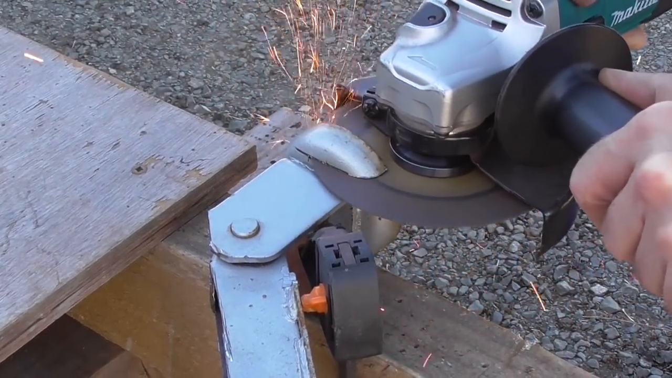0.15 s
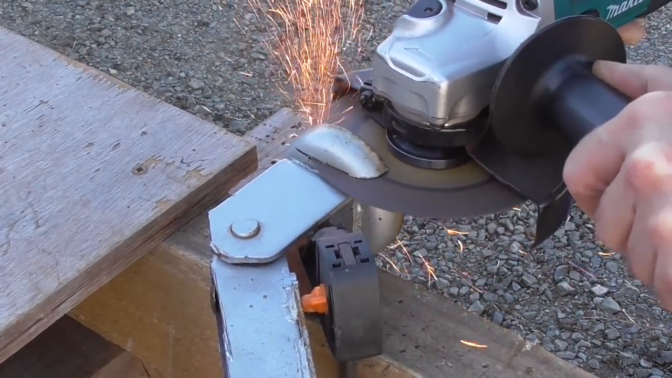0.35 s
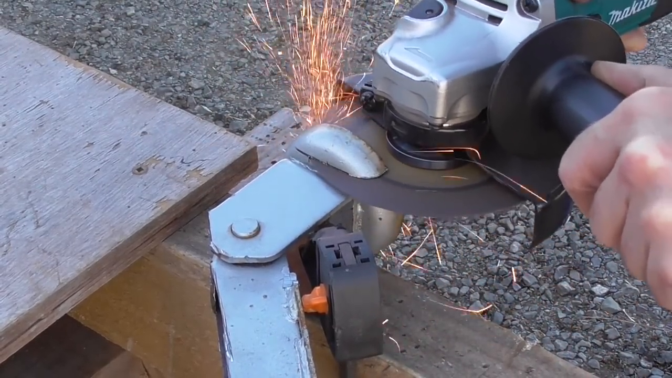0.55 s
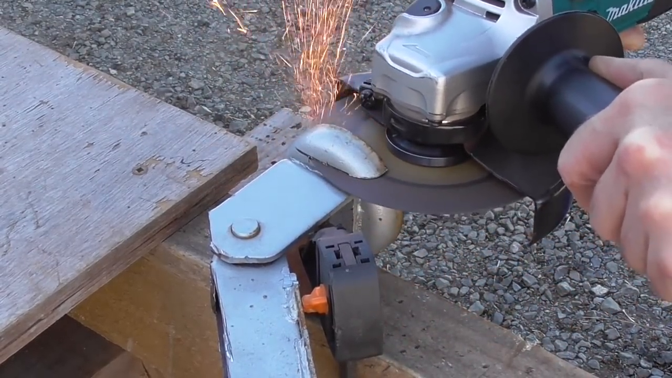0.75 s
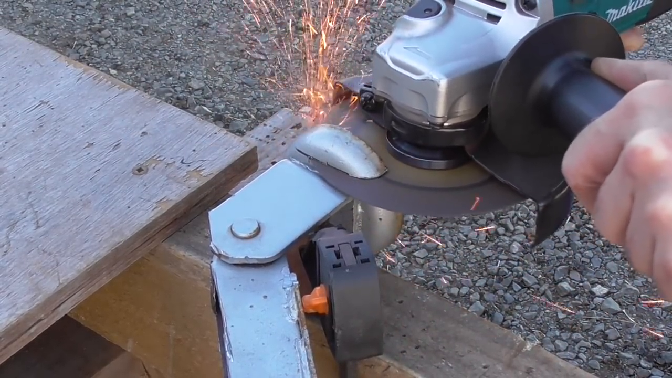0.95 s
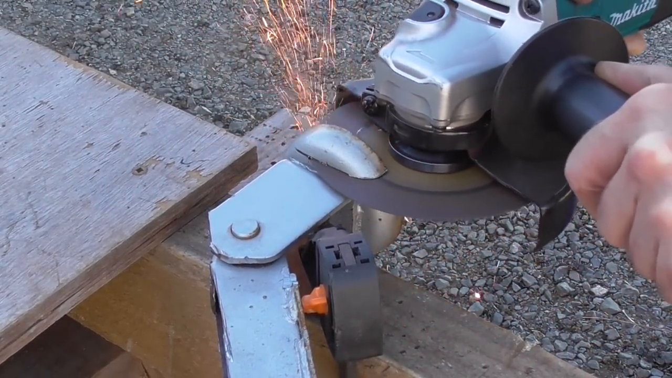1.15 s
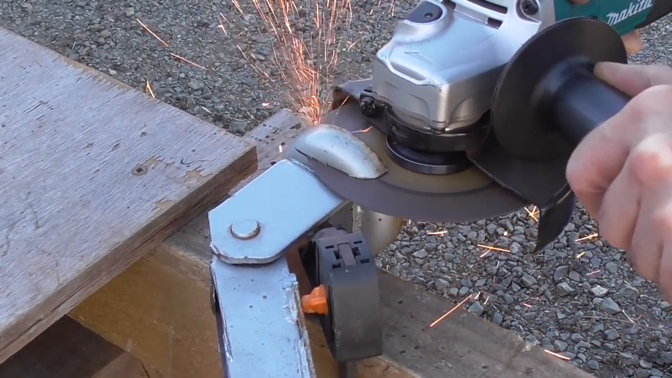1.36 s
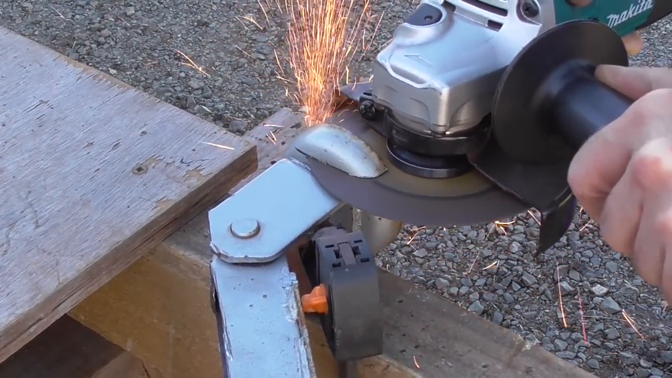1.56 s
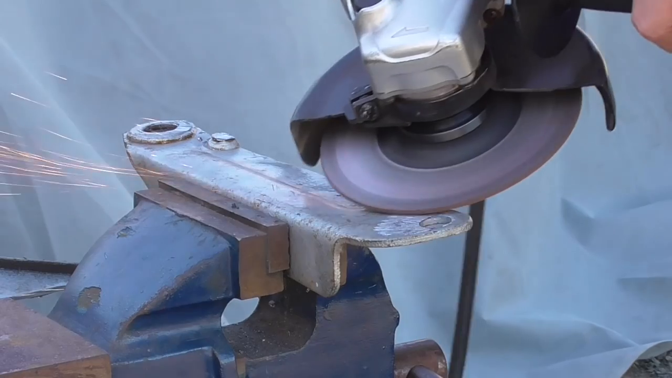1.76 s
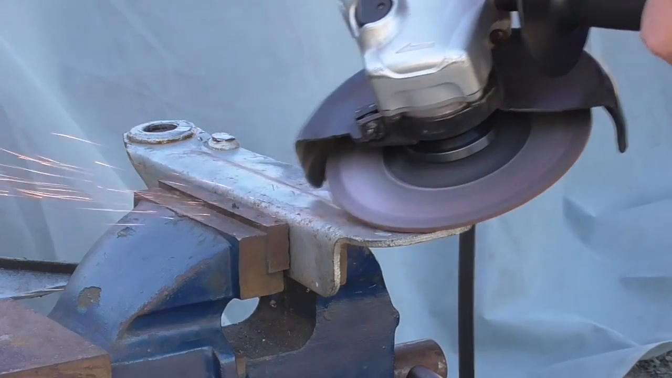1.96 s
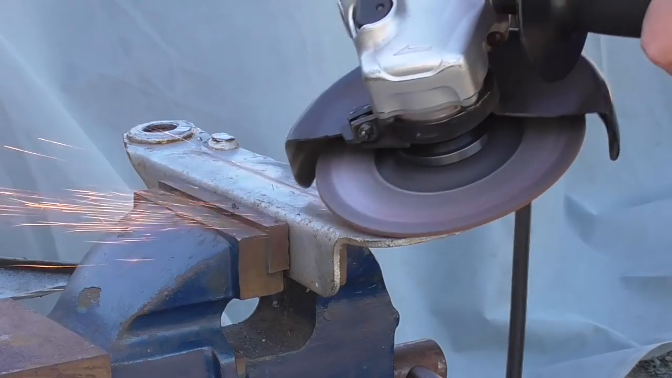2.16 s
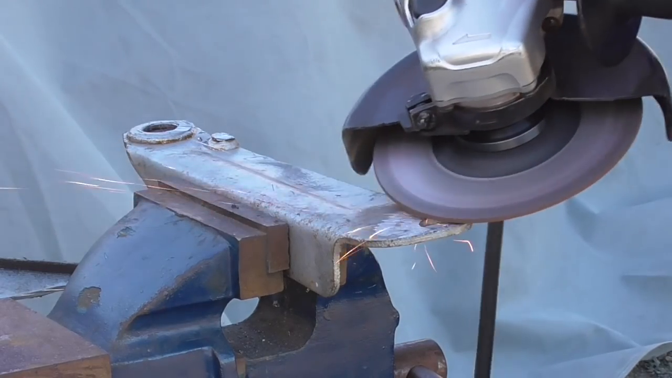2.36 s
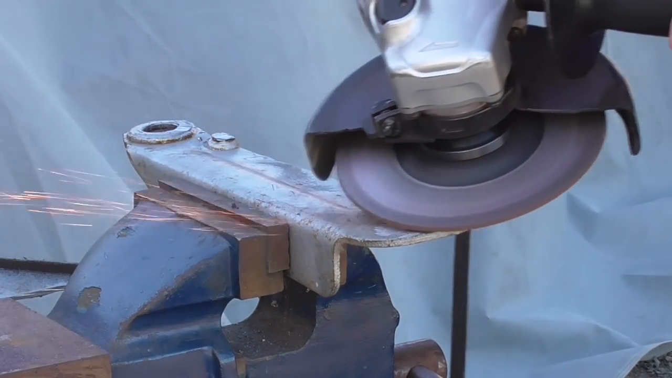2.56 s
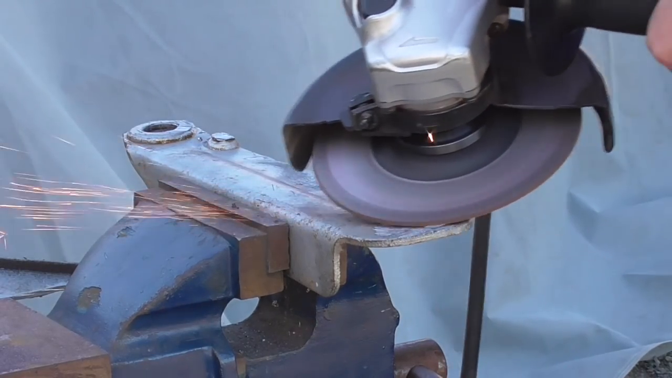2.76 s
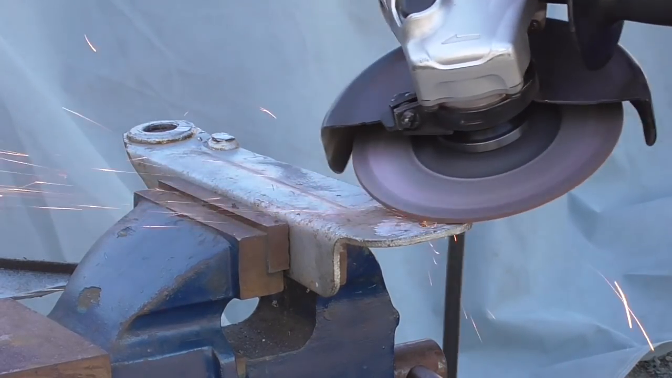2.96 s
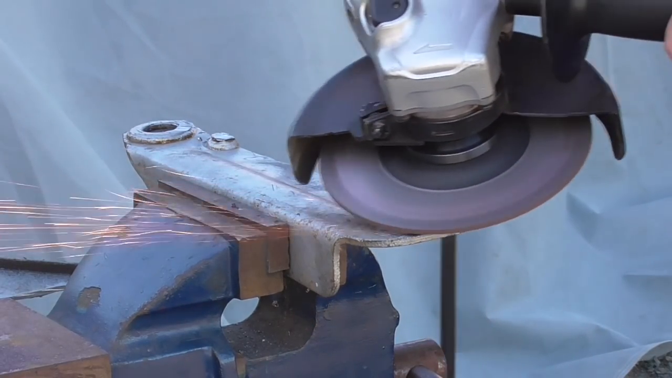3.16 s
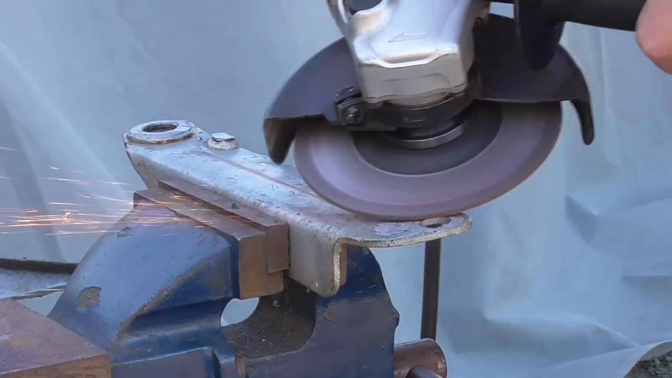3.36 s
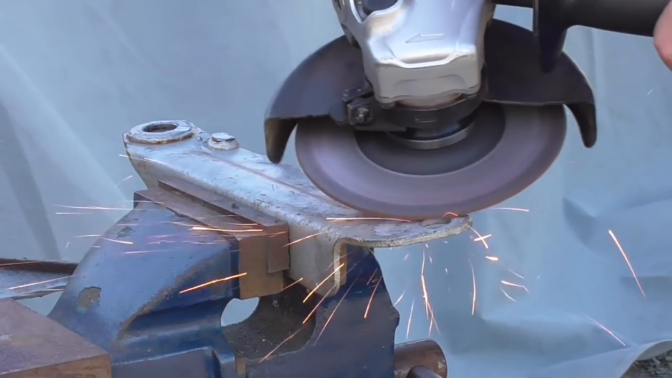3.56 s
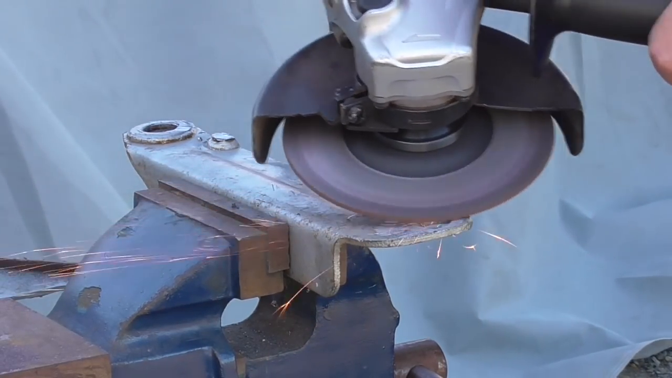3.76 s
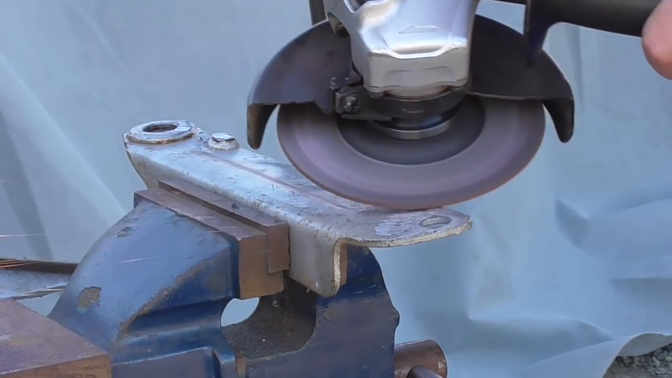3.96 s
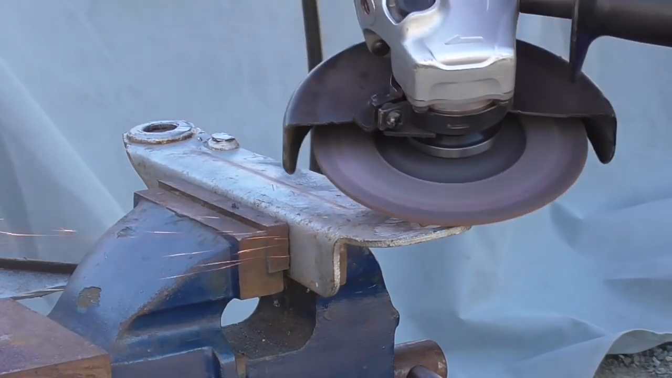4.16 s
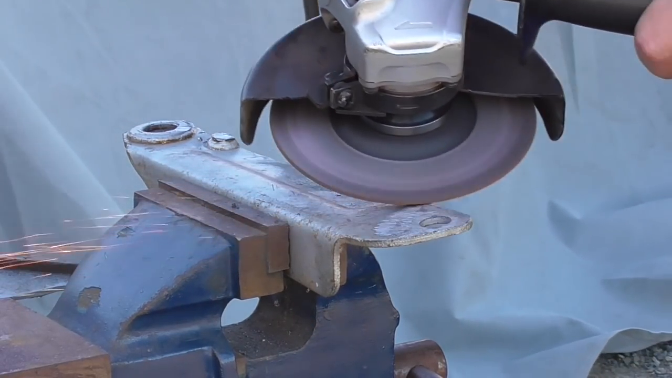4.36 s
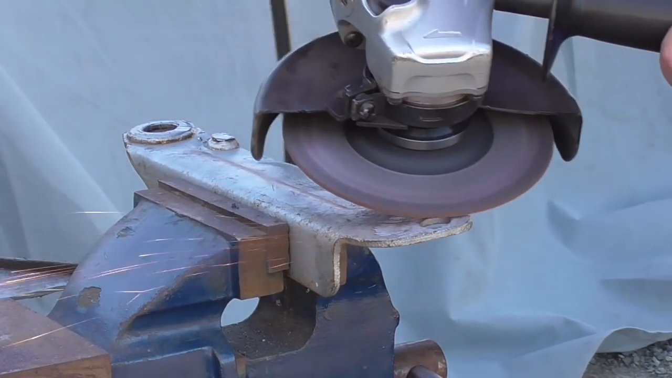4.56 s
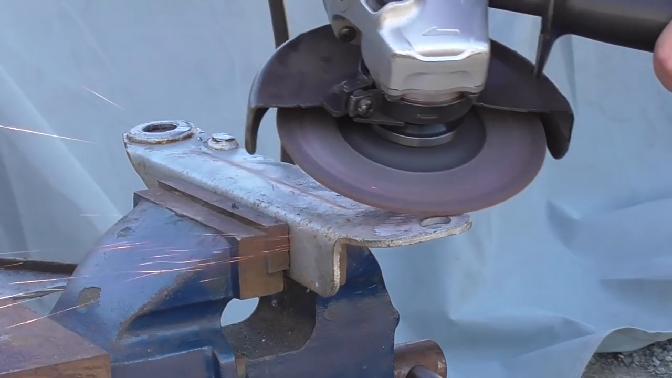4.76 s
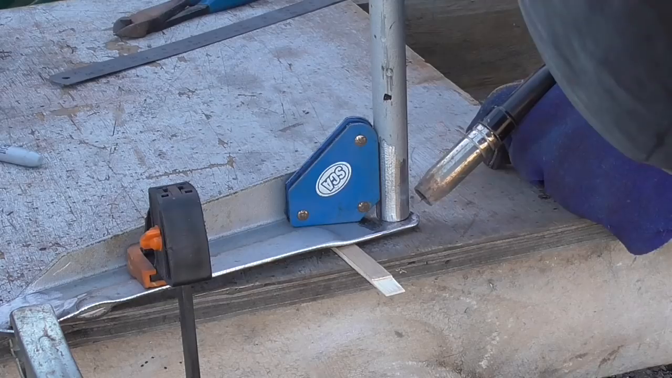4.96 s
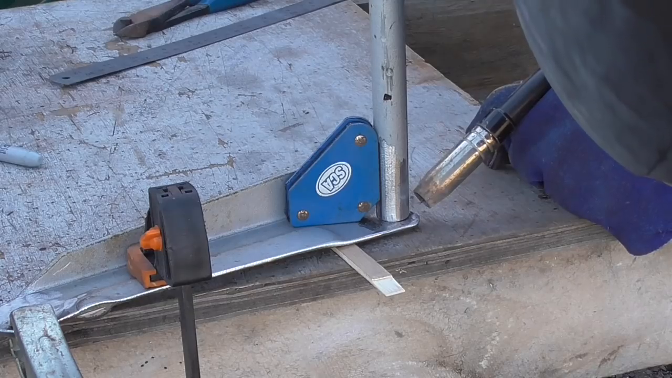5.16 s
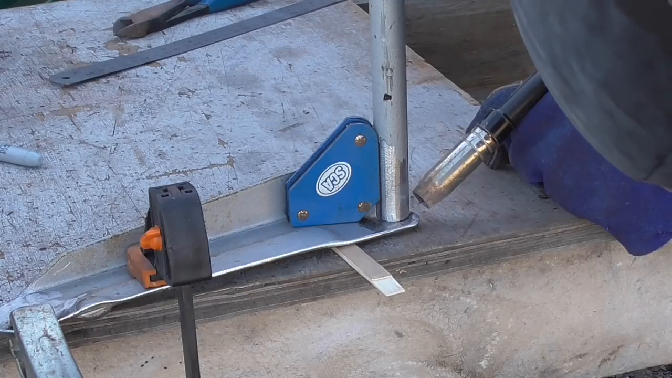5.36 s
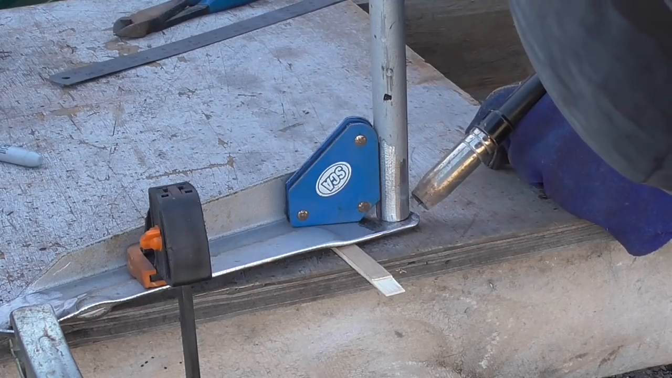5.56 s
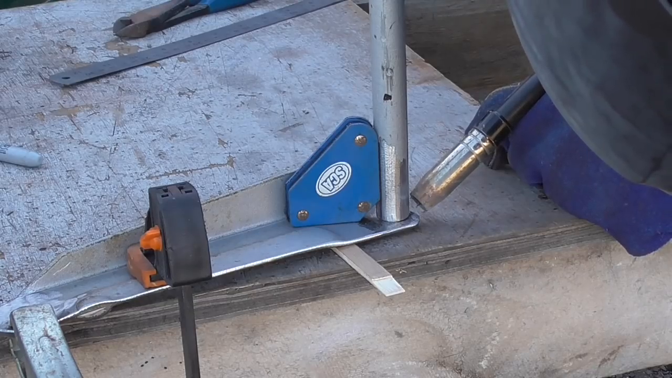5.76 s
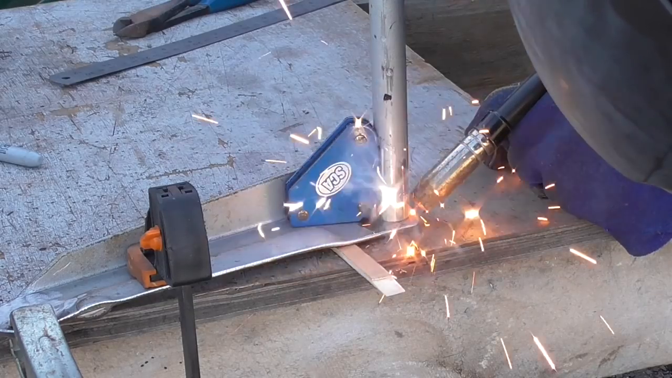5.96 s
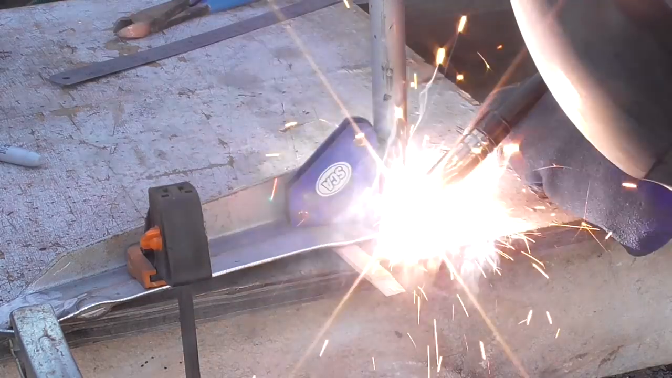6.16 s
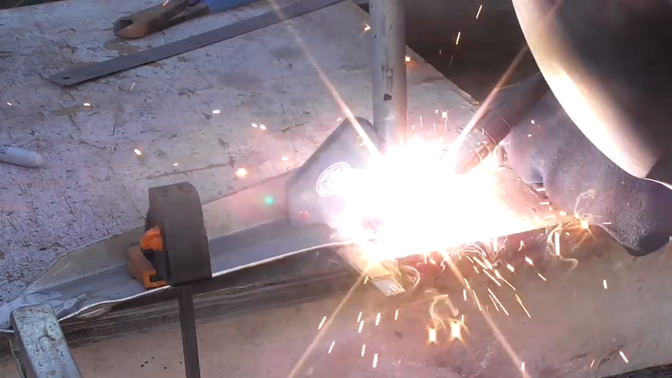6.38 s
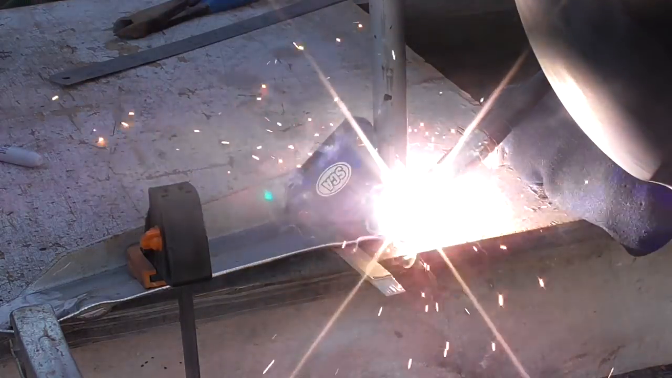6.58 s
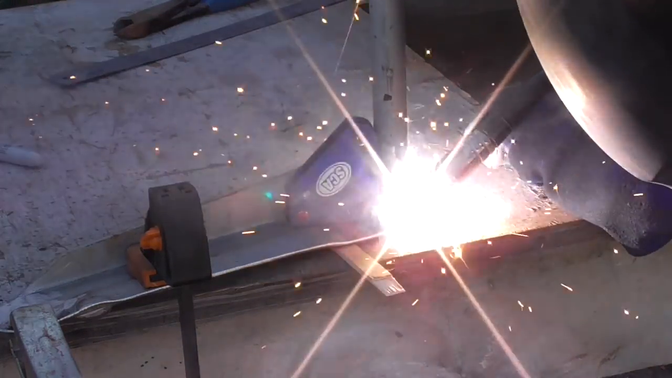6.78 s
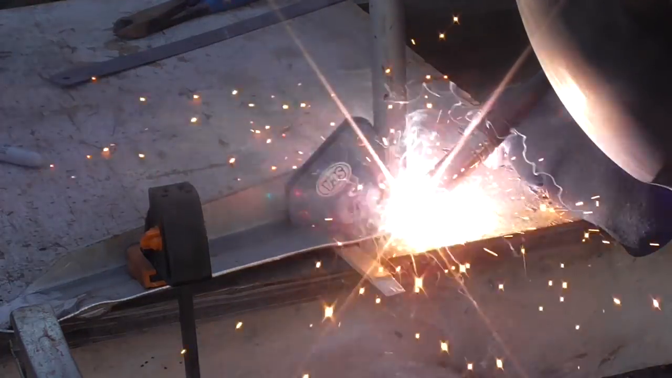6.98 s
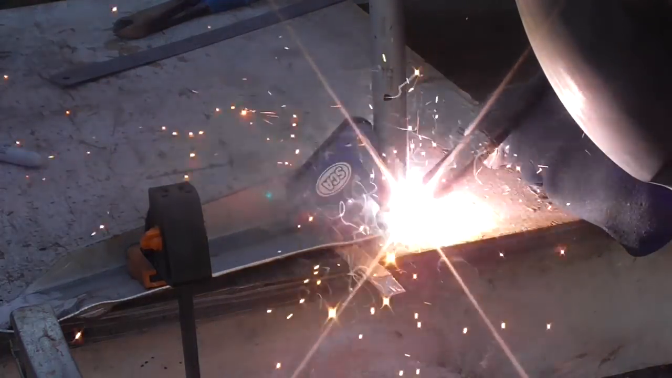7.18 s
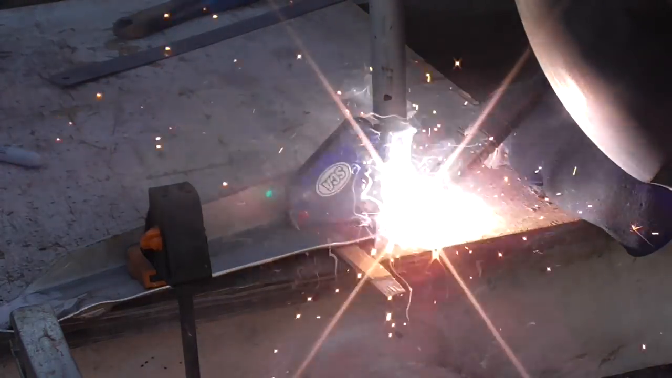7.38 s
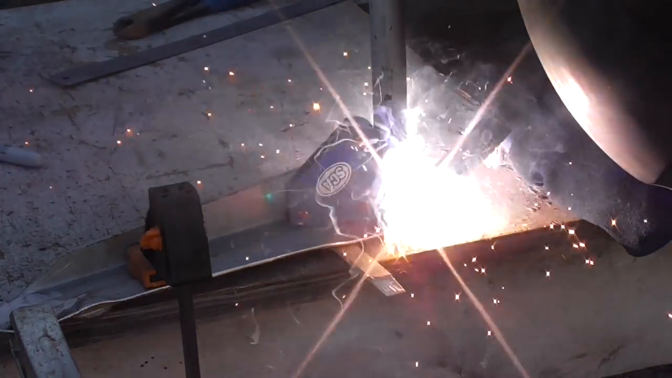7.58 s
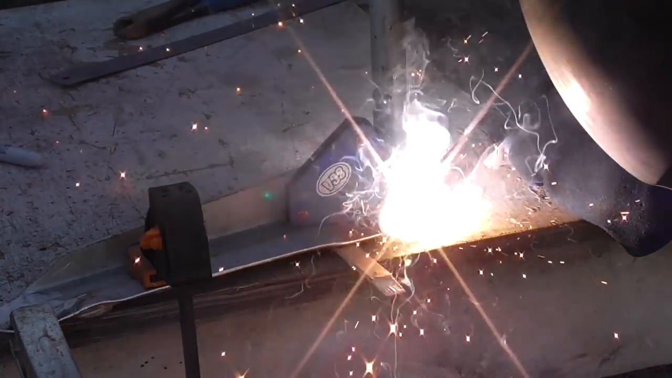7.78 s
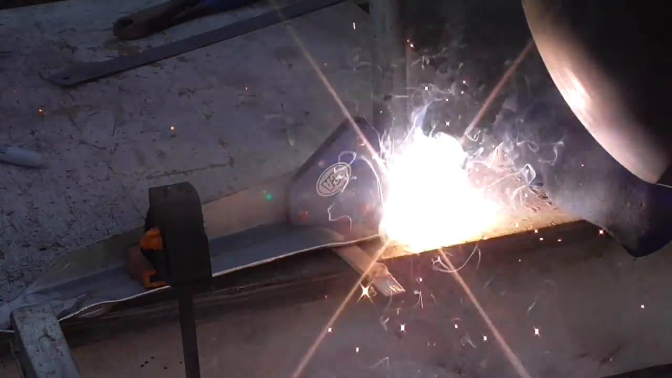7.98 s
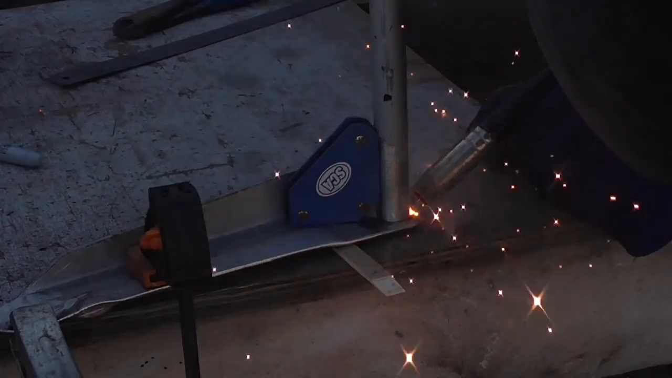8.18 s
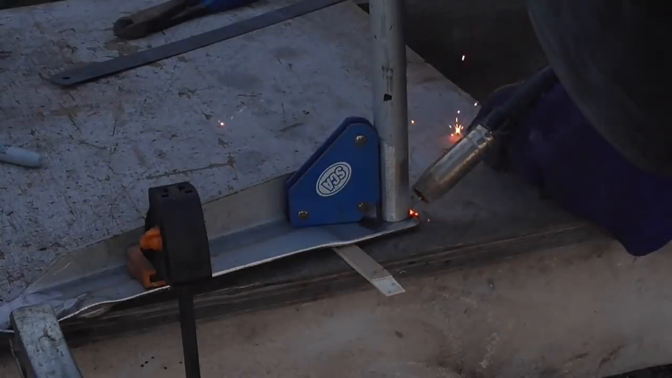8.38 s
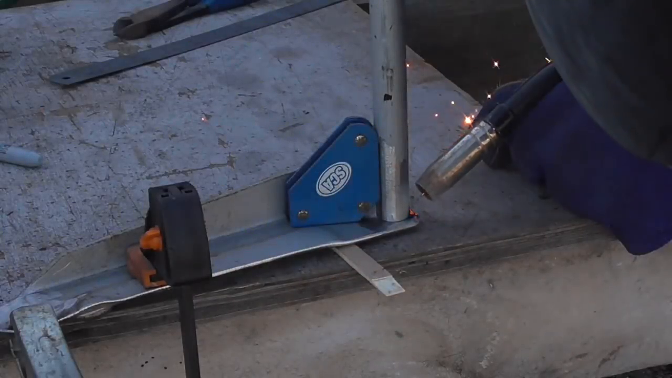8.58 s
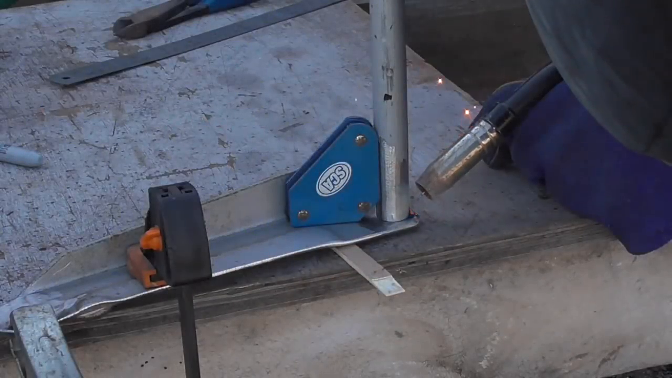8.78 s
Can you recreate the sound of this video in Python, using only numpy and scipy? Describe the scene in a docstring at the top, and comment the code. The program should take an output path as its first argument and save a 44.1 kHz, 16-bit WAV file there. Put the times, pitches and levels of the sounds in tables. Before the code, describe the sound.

Close up outdoors, a cutting disc tears through steel with a bright, steady rasp and whine. It abruptly becomes a grinding disc stroking a clamped bracket, chattering at first, then smoother, with brief squeals. Another sudden jump leaves a humming fan, shrill insects, a faint bird chirp and buffeting wind. A scuff and one sputter precede a loud buzzing, crackling weld, which stops sharply, leaving the fan.

```python
"""An angle grinder cuts a steel bar, then dresses a bracket, then a wire welder runs a bead: three outdoor jobs,
switching abruptly. The discs are noise repeating each turn, shaped by steel resonances, under a whine of sines.
The bracket scrapes once a turn, chatters, rings and squeals. The arc is noise pulsed by a 100 Hz supply ripple,
with impulses for shorting wire and bursting droplets. Wind of filtered noise runs throughout, with gusts during
the cutting and the welding; the weld also has a fan, insects of resonant noise and a bird of gliding sines."""
import sys
import numpy as np
from scipy import signal
from scipy.fft import rfft, irfft
from scipy.io import wavfile
from scipy.ndimage import uniform_filter1d, map_coordinates

SR = 44100
rng = np.random.default_rng(int(sys.argv[2]) if len(sys.argv) > 2 else 0)


def master(y):
    """Save y as 16-bit WAV."""
    cut = np.clip(np.atleast_2d(y).T, -1, 1)
    pcm = np.round(cut * 32767)  # scale
    wavfile.write(sys.argv[1], SR, pcm.astype(np.int16))


N = 389403
TIME = np.arange(N) / SR
CUT_END_S, GRIND_END_S = 1.655, 4.951

# Cutting disc speed: (time [s], speed [turns/s])
CUT_SPEED = [(0, 127.6), (.2, 123.5), (.35, 132.4), (.42, 128.6), (.52, 126.3), (.63, 131.9), (.69, 130.1),
             (.76, 132.4), (.85, 131.8), (.95, 134.1), (1.08, 130.5), (1.16, 126.2), (1.31, 131),
             (1.44, 126.3), (1.65, 123.1)]
# Tone of the cutting rasp: (frequency [Hz], level [dB per Hz])
CUT_COLOUR = [(60, -37), (250, -17), (550, -11.5), (850, -10.5), (1400, -5.5), (1800, -12.5), (2700, -12),
              (3400, -4), (4300, 2), (5400, -4.5), (7500, -2.5), (9300, 1.5), (12000, -6), (15500, -13.5)]
# Resonances of bar and guard: (frequency [Hz], width [Hz], lift [dB])
CUT_MODES = [(1525, 170, 5.5), (4570, 200, 4), (11010, 100, 11.5)]
# Pushes of the hand into the slot: (middle [s], rise [dB])
PUSHES = [(.16, 2), (.39, 2), (.66, 2.5), (.97, 2), (1.35, 1.5), (1.58, 2)]
# The bar sings as the disc binds: (middle [s], length [s], multiple of disc speed [1], level [dB])
CUT_SWELLS = [(.33, .18, 12, -51), (.41, .12, 11, -50), (.86, 0.41, 11, -51), (1.103, .13, 36, -41),
              (1.197, .16, 18, -56), (1.303, 0.11, 12, -48), (1.48, 0.11, 18, -54), (1.56, .2, 12, -53)]
CUT_DB, PUSH_S = -35.5, 0.15  # steady feed before the pushes; length of one push

# Light air round the grinder: (time [s], level [dB])
LIGHT_AIR = [(0, -68), (2.4, -66.5), (3.5, -78), (4.95, -80)]
# Gusts during cutting and welding: (middle [s], length [s], level [dB])
GUSTS = [(.56, 0.56, -58.5), (1.386, 0.29, -56), (5.0, 0.17, -42), (5.236, 0.17, -43), (5.45, 1.54, -52),
         (5.66, 0.36, -46), (5.898, 0.27, -40.5), (6.38, 0.24, -49), (6.813, 0.55, -49.5)]
# Tone of the wind: (frequency [Hz], level [dB per Hz])
WIND_COLOUR = [(20, -14), (40, -12), (70, 1.5), (120, 4.5), (185, 5.5), (280, -6.5), (500, -17.5),
               (1200, -26), (4000, -54)]
WELD_AIR_DB, GUST_SHAPE = -63, 1.3  # light air of the weld before YARD_LEVEL; gust sharpness

# Grinding disc speed: (time [s], speed [turns/s])
GRIND_SPEED = [(1.7, 155), (2.32, 152.8), (2.5, 154.8), (2.92, 154.5), (3.22, 154), (4.12, 154.7),
               (4.27, 154.7), (4.57, 156.1), (4.95, 155.6)]
# Tone of the scrape: (frequency [Hz], level [dB per Hz])
GRIND_COLOUR = [(300, -27.5), (1200, -20), (2800, -10.5), (4000, -3), (4800, -2.5), (6000, 1), (8300, 3),
                (10500, 1), (12500, -7.5), (15500, -16.5)]
# Resonances of the bracket: (frequency [Hz], width [Hz], level before pressure [dB])
BRACKET_MODES = [(4246, 120, -15.5), (6486, 270, -6), (7000, 640, -14.5), (7490, 260, -16.5),
                 (8930, 290, -16.5), (9900, 300, -21), (11270, 230, -26), (12970, 220, -21.5)]
# Strokes over the bracket: (middle [s], length [s], level [dB], chatter [0-1], treble change [dB])
STROKES = [(1.87, 0.33, -31, 1, -9), (2.114, 0.24, -31.5, 1, 2.5), (2.329, 0.29, -30.3, 0.85, -2.5),
           (2.543, 0.18, -31.5, 0.3, 1.5), (2.726, 0.2, -30.5, 0.4, 0), (3.005, 0.34, -30, 0.6, -2),
           (3.288, 0.28, -29.5, 0.52, -0.5), (3.605, 0.52, -31.5, 0.5, -1), (3.939, 0.2, -29, 0.06, -3),
           (4.139, 0.24, -32.5, .15, 5.5), (4.305, .13, -30.5, 0.3, 0.5), (4.506, 0.3, -33, 0.2, 4),
           (4.84, 0.45, -32.5, 0.06, 4)]
# One bracket mode locks into a squeal: (middle [s], length [s], pitch [Hz], level before the later lift [dB])
SQUEALS = [(1.97, 0.13, 4170, -46.5), (2.345, 0.21, 5200, -43.5), (2.668, 0.1, 5200, -47),
           (2.69, 0.13, 9020, -40), (2.999, .085, 5230, -44), (3.01, .14, 9030, -43),
           (3.285, 0.11, 5230, -38), (3.28, .15, 9040, -43), (2.56, .12, 10050, -44),
           (3.61, .08, 5227, -48), (3.74, 0.25, 7370, -45.5), (4.15, 0.17, 7470, -36),
           (4.3, .1, 4190, -43.5), (4.32, .1, 8870, -40.5), (4.5, 0.23, 7500, -39.5),
           (4.81, 0.13, 7473, -37.5)]
# Tone of the motor air: (frequency [Hz], level [dB per Hz])
MOTOR_AIR = [(40, -24), (120, -21), (230, -10.5), (330, -13), (480, -7), (750, -8.5), (1200, -3.5),
             (1550, -2.5), (1730, -21), (2050, -0.5), (2450, -5), (2800, -6.5), (5000, -1.5), (15000, -27)]
# Gear and fan whine: (multiple of disc speed [1], level before flutter [dB])
MOTOR_LINES = [(3, -68.5), (8, -72.5), (12, -63.5), (13, -61.5), (15, -68.5), (16, -67)]
# The whine swells as the tool tilts: (middle [s], length [s], multiple of disc speed [1], level [dB])
GRIND_SWELLS = [(3.8, .16, 16, -52), (3.95, .22, 13, -54), (4.12, .18, 16, -52.5), (4.52, .26, 16, -52),
                (4.63, 0.21, 13, -48), (4.85, .22, 16, -50)]
STROKE_SHAPE, SKIM_DB, TREBLE_HZ = 0.45, -39, 10700  # roundness of a stroke; skimming between strokes
RASP_HZ, RASP_AT_HZ, RASP_POWER = 22, 5200, 2.7  # squeal pitch jitter; higher modes are raspier

# The yard sinks while the arc burns and swells back: (time [s], change [dB])
YARD_LEVEL = [(4.95, -2.5), (5.96, -1.5), (6.3, -9.5), (8.28, -12.5), (8.83, -4.5)]
# Tone of the fan's blowing: (frequency [Hz], level [dB per Hz])
YARD_AIR = [(100, -6.5), (280, 3.5), (380, -4), (480, 3), (700, -3), (1000, -4.5), (1400, -8),
            (1800, -17.5), (2800, -20), (4000, -14), (6000, -23), (10000, -26), (15000, -35)]
# Fan hum: (multiple of blade rate [1], level before swelling and YARD_LEVEL [dB])
FAN_LINES = [(1, -44.5), (2, -57.5)]
# Calls of a distant bird: (middle [s], length [s], start pitch [Hz], end pitch [Hz], level before flutter [dB])
CHIRPS = [(5.1, .05, 4720, 4560, -56), (5.49, .15, 4340, 3550, -53), (8.512, 0.14, 3990, 3350, -61)]

# Arc strength as the torch moves along the seam: (time [s], level before flares and tone [dB])
ARC = [(6.2, -31.5), (6.5, -31), (7.35, -31), (7.6, -34), (8.21, -32.5)]
# The arc flares or sinks to a lull: (middle [s], length [s], change [dB])
FLARES = [(6.42, 0.13, 4.5), (6.565, 0.053, -4), (6.69, 0.17, -2.5), (6.805, 0.082, 2), (6.92, .07, 1.5),
          (7.145, 0.094, 2.5), (7.67, 0.048, -3), (7.8, 0.097, 5.5), (8.116, 0.073, 4.5)]
# The cold wire strikes the work: (time [s], flash level before tone [dB])
STRIKES = [(5.9776, -19), (6.1746, -15.5)]
# Loudest shorts of the wire and pops of spatter: (time [s], impulse level before tone [dB])
POPS = [(5.9759, -2), (6.0207, -5), (6.0603, -10.5), (6.1729, -2), (6.1952, -7), (6.235, -9),
        (6.2565, -4.5), (6.2744, -7), (6.3075, -9.5), (6.337, -7.5), (6.354, -10), (6.3958, -9),
        (6.4116, -14), (6.4344, -7.5), (6.465, -4.5), (6.473, -6.5), (6.5455, -8.5), (6.555, -9),
        (6.58, -10.5), (6.6133, -6.5), (6.6947, -8), (6.7153, -9.5), (6.8242, -10), (6.8355, -7.5),
        (6.8661, -8.5), (6.9362, -8.5), (6.9748, -9.5), (7.0544, -9.5), (7.0647, -9), (7.085, -9),
        (7.1163, -9), (7.1419, -9), (7.2254, -11), (7.2452, -8), (7.276, -11), (7.3351, -8), (7.464, -7),
        (7.5254, -9.5), (7.5514, -10), (7.5644, -11), (7.6055, -7.5), (7.626, -8.5), (7.6847, -9),
        (7.7249, -8), (7.765, -7), (7.8059, -10), (8.1056, -8.5), (8.165, -9.5), (8.1849, -9), (8.203, -6),
        (8.297, -27), (8.3779, -30)]
# Tone of the whole arc: (frequency [Hz], level [dB per Hz])
ARC_COLOUR = [(60, -16), (250, -1), (500, -3.5), (1100, 0), (1650, -5.5), (2100, -3), (2850, -7.5),
              (3750, 3), (4700, 5), (6200, -5.5), (8200, 7), (9400, -1), (10600, 6), (12700, -4),
              (15700, -12)]
# Extra brightness of the cracks: (frequency [Hz], lift [dB])
CRACK_COLOUR = [(9000, 1.5), (15000, 4.5)]
ARC_ON_S, ARC_OFF_S, ARC_RELEASE_S = 6.175, 8.22, 0.014
FALSE_START_S, FALSE_START_LENGTH_S, FALSE_START_DB = 6.029, 0.068, -22  # one sputter before the arc holds
RIPPLE_HZ, CREST_S = 100, .0063  # supply ripple; time of its first crest
SHORT_CHANCE, SHORT_DB, SHORT_JITTER_S = .36, 12.5, .0014  # lesser shorts: chance per crest; level over the arc
POP_RISE_S = .0011  # delay of a pop after its listed time
FLASH_DECAY_S, LULL_DB = 0.0017, -4.5  # the sizzle drops while the wire touches the pool

# Tone of the scattered sound: (frequency [Hz], level [dB])
SCATTER_COLOUR = [(300, -1), (650, 3.5), (1400, 0.5), (3000, 1.5), (6500, 1), (9500, -1.5), (15000, 1.5)]
SHADE, SHADE_HZ = 0.2, 9900  # the shortest waves are softer on the left, stronger on the right
TOP_HZ = 15900


def amp(db):
    """Decibels to gain."""
    return 10 ** (np.asarray(db) / 20)


def unit(x):
    """Scale to rms 1."""
    return x / np.sqrt(np.mean(x ** 2))


def noise():
    """White noise with a spread of 1."""
    return rng.standard_normal(N)


def curves(table):
    """Each column of a timed table, at every sample."""
    s, *columns = np.transpose(table)
    return [np.interp(TIME, s, column) for column in columns]


def during(start, end):
    """1 between two times, with edges of about a millisecond."""
    return uniform_filter1d(1. * ((TIME >= start) & (TIME < end)), size=48)


def arch(s, length, shape=1):
    """Rise and fall round a moment, top 1; a larger shape is sharper."""
    return np.maximum(1 - (2 * (TIME - s) / length) ** 2, 0) ** shape


def walk(rate):
    """Smooth random wander of rms 1, with a given number of knots a second."""
    knots = rng.standard_normal(8192)[:int(TIME[-1] * rate) + 8]
    smooth = signal.resample_poly(knots, 8, 1)
    return unit(np.interp(TIME * rate, np.arange(len(smooth)) / 8, smooth))


def colour(x, spectrum, modes=()):
    """Minimum-phase filter: a broad (Hz, dB) shape with resonances standing on it."""
    size = 8192
    f = np.arange(size // 2 + 1) * SR / size
    hz, db = np.transpose(spectrum)
    gain = amp(np.interp(np.log(f + 1), np.log(hz), db))
    for centre, width, lift in modes:
        gain = gain * amp(lift / (1 + (2 * (f - centre) / width) ** 2))
    # folding the cepstrum forward in time makes the filter causal
    cepstrum = irfft(np.log(gain))
    cepstrum[1:size // 2] *= 2
    cepstrum[size // 2 + 1:] = 0
    impulse = irfft(np.exp(rfft(cepstrum)))
    return signal.oaconvolve(x, impulse)[:N]


def highpass(x, hz):
    """Keep the treble, without shifting it in time."""
    return signal.filtfilt(*signal.butter(2, hz, "high", fs=SR), x)


def resonate(x, hz, width_hz):
    """One resonance, gain 1 at its centre."""
    return signal.lfilter(*signal.iirpeak(hz, hz / width_hz, fs=SR), x)


def fade(x, decay_s):
    """Give each impulse an exponential tail."""
    return signal.lfilter([1], [1, -np.exp(-1 / (decay_s * SR))], x)


def turns_of(hz):
    """Cycles completed at each sample."""
    return np.cumsum(hz * np.ones(N)) / SR


def tones(turns, lines, waver_db=2.5):
    """Sines on multiples of a rotation, each wavering in level."""
    out = np.zeros(N)
    for multiple, db in lines:
        level = np.sqrt(2) * amp(db + waver_db * walk(8.3))
        out += level * np.sin(2 * np.pi * multiple * turns)
    return out


def swells(turns, table):
    """Single partials of the whine rise and fall, trembling, and glide with the disc."""
    sung = np.zeros(N)
    for s, length, multiple, db in table:
        sung += amp(db) * arch(s, length) * np.cos(2 * np.pi * multiple * turns)
    return np.sqrt(2) * sung * amp(2.1 * walk(70))


def place(x, side_db, left_db):
    """Stereo: scatter off bench, hands and ground differs left and right, and shifts as time goes on."""
    age = TIME[:2048]
    scatters = rng.standard_normal((2, len(age))) * np.exp(-age / .007) * (age > .0003)
    one, other = (signal.oaconvolve(x, colour(s / np.linalg.norm(s), SCATTER_COLOUR))[:N] for s in scatters)
    angle = 1.52 * walk(4.2)
    side = amp(side_db) * (np.cos(angle) * one + np.sin(angle) * other)
    side = side - SHADE * highpass(x, SHADE_HZ)
    left = (x + side) * amp(left_db / 2)
    right = (x - side) * amp(-left_db / 2)
    return np.array([left, right])


def grit(turns, wear_turns, fresh_db):
    """The rim's grains repeat every turn and slowly wear into a new pattern; torn chips add fresh noise."""
    rims = signal.resample(rng.standard_normal((400, 256)), 2048, axis=1)
    position = turns % 1 * (rims.shape[1] - 1)
    rim = map_coordinates(rims, [turns / wear_turns, position], order=1, mode="wrap")
    return unit(unit(rim) + amp(fresh_db) * noise())


def cutting():
    """A thin disc buried in the slot: steady contact swells with each push, and the whine follows the disc."""
    (speed_hz,) = curves(CUT_SPEED)
    feed_db = CUT_DB + sum(db * arch(s, PUSH_S, shape=2.2) for s, db in PUSHES)
    turns = turns_of(speed_hz * (1 + 0.0012 * walk(24.93)))
    twice_a_turn = np.cos(4 * np.pi * turns)
    bite = amp(0.67 * walk(60.05) + 1.0 * walk(700) + 0.47 * twice_a_turn)
    rasp = unit(colour(grit(turns, wear_turns=10, fresh_db=3.5) * bite, CUT_COLOUR, CUT_MODES))
    # each partial of the whine sings out as it glides through a resonance of the bar
    cluster = tones(turns, [(k, -53) for k in range(31, 41)])
    sung = resonate(cluster, 4600, 160) + resonate(cluster, 4290, 260) * amp(-4.5)
    whine = sung + tones(turns, [(12, -61), (14, -64)]) + swells(turns, CUT_SWELLS)
    return place(rasp * amp(feed_db) + whine, side_db=-13.0, left_db=-0.5) * during(0, CUT_END_S)


def wind():
    """Low noise as light air, with gusts in cutting and welding; its opposite-phase part is strongest in the lows."""
    (air_db,), (yard_db,) = curves(LIGHT_AIR), curves(YARD_LEVEL)
    force = amp(np.where(TIME < GRIND_END_S, air_db, WELD_AIR_DB + yard_db))
    for s, length, db in GUSTS:
        # a gust never crosses between grinding and welding
        same_job = (TIME < GRIND_END_S) == (s < GRIND_END_S)
        force = force + amp(db) * arch(s, length, GUST_SHAPE) * same_job
    mid, side = (unit(colour(noise(), WIND_COLOUR)) for _ in range(2))
    side = colour(side, [(60, 13.0), (110, 4.9), (200, 6.8), (400, 5)])
    # one low thump in a gust before the weld
    swell = amp(-22) * np.exp(-((TIME - 5.915) / 0.028) ** 2)
    thump = np.sin(2 * np.pi * turns_of(182 + 28 * walk(110))) * swell
    return force * np.array([mid + side, mid - side]) + place(thump, side_db=-13, left_db=3)


def squeals(table):
    """Modes that lock into a rasping tone, swell and let go."""
    out = np.zeros(N)
    for s, length, hz, db in table:
        on = np.abs(TIME - s) < length / 2
        jitter = unit(uniform_filter1d(noise()[on], size=64))
        pitch_hz = hz + RASP_HZ * (hz / RASP_AT_HZ) ** RASP_POWER * jitter
        swell = amp(db) * np.cos(np.pi * (TIME[on] - s) / length)
        out[on] += swell * np.sin(2 * np.pi * np.cumsum(pitch_hz) / SR)
    return out


def grinding():
    """The disc strokes the bracket, wobbling once a turn; when it bounces, every second turn lands harder."""
    (speed_hz,), (_, _, chatter, treble_db) = curves(GRIND_SPEED), curves(STROKES)
    # pressure is greatest in mid stroke
    power = amp(SKIM_DB) ** 2
    for s, length, db, _, _ in STROKES:
        power = power + (amp(db) * arch(s, length, STROKE_SHAPE)) ** 2
    pressure = np.sqrt(power)
    turns = turns_of(speed_hz * (1 + 0.000656 * walk(25)))
    wobble = np.cos(2 * np.pi * turns)
    bounce = np.cos(np.pi * turns + 2.0 * walk(14))
    push = 0.61 * wobble + chatter * (0.81 * bounce + 0.36 * walk(110))
    contact = amp(7.15 * np.tanh(push))
    contact /= np.sqrt(uniform_filter1d(contact ** 2, size=2048))
    force = grit(turns, wear_turns=20, fresh_db=3) * contact
    scrape = unit(colour(force, GRIND_COLOUR)) * amp(-4.0)
    # the contact point slides over the bracket, so its modes swell and fade each in their own time
    for hz, width_hz, db in BRACKET_MODES:
        ring = unit(resonate(resonate(force, hz, width_hz), hz, 2 * width_hz))
        woken = (pressure / amp(-31.5)) ** (-.03 * db)  # the weaker the mode, the more pressure it needs
        scrape = scrape + ring * amp(db) * woken * unit(amp(2.7 * walk(14)))
    treble = highpass(scrape, TREBLE_HZ)
    steel = (scrape + (amp(treble_db) - 1) * treble) * pressure
    steel = steel + squeals(SQUEALS) * contact ** 0.89 * amp(9.0)
    # the motor's whine flutters, and single partials stand out as the tool tilts
    whine = tones(turns, MOTOR_LINES) * amp(2.8 * walk(40)) + swells(turns, GRIND_SWELLS)
    judder = chatter * tones(turns, [(1.5, -68)])
    air = unit(colour(grit(turns, wear_turns=15, fresh_db=6), MOTOR_AIR)) * amp(-45.5)
    motor = air + whine + judder
    both = place(steel, side_db=-18.0, left_db=-0.4) + place(motor, side_db=-9.5, left_db=-0.5)
    return both * during(CUT_END_S, GRIND_END_S)


def distant_bird():
    """Gliding sines with a fast pitch tremble and a broken, fluttering level."""
    bird = np.zeros(N)
    for s, length, start_hz, end_hz, db in CHIRPS:
        along = np.clip((TIME - s) / length + .5, 0, 1)
        pitch_hz = start_hz + (end_hz - start_hz) * along + 110 * walk(500)
        bird += amp(db) * np.sin(np.pi * along) * np.sin(2 * np.pi * turns_of(pitch_hz))
    return bird * unit(amp(3.3 * walk(55)))


def yard():
    """The welder's fan hums at its blade rate and blows, insects shrill steadily, a bird calls far off."""
    (level_db,) = curves(YARD_LEVEL)
    # the arc loads the supply and slows the fan a little
    blade_hz = np.interp(TIME, [6.1, 6.8, 8.25, 8.83], [223.9, 220.5, 220.7, 222.5]) + 0.604 * walk(12)
    hum_lift_db = np.interp(TIME, [8.0, 8.8], [1, 3])
    hum = tones(turns_of(blade_hz), FAN_LINES, waver_db=0.4) * amp(hum_lift_db)
    fan = hum + unit(colour(noise(), YARD_AIR)) * amp(-43.0)
    shrill = unit(resonate(resonate(noise(), 8200, 1050), 8530, 1500))
    insects = shrill * amp(-49.0 + 1.0 * walk(40))
    near = place(fan, side_db=-8, left_db=0.6) + place(insects, side_db=-21, left_db=0.0)
    return (near * amp(level_db) + distant_bird()) * during(GRIND_END_S, np.inf)


def knock():
    """A short scuff as the welder gets into position: noise with a sudden start and exponential decay."""
    age = np.maximum(TIME - 5.881, 0)
    scuff = unit(colour(noise(), [(200, 5.5), (1000, -6), (4000, -11.0), (9000, -5), (15000, -27)]))
    return place(scuff * (age > 0) * np.exp(-age / 0.026) * amp(-30.0), side_db=-15, left_db=0.5)


def wire_shorts(burn):
    """One impulse for each short: the loud ones, and lesser ones by chance near the crests of the ripple."""
    crests = np.arange(CREST_S, TIME[-1] - .02, 1 / RIPPLE_HZ)
    late = rng.standard_normal(len(crests))
    happens = rng.random(len(crests)) < SHORT_CHANCE
    at = ((crests + SHORT_JITTER_S * late) * SR).astype(int)
    shorts = np.zeros(N)
    shorts[at] = happens * burn[at] * amp(SHORT_DB)
    for s, db in POPS:
        shorts[int((s + POP_RISE_S) * SR)] = amp(db)
    return shorts


def welding():
    """The arc flashes alight and sizzles on each supply ripple; shorts of the wire burst as sharp cracks."""
    (run_db,) = curves(ARC)
    run_db = run_db + sum(db * arch(s, length) for s, length, db in FLARES)
    release = np.exp(-np.maximum(TIME - ARC_OFF_S, 0) / ARC_RELEASE_S)
    run = amp(run_db) * (TIME > ARC_ON_S) * release
    burn = run + amp(FALSE_START_DB) * arch(FALSE_START_S, FALSE_START_LENGTH_S, shape=3.1)
    ripple = np.cos(2 * np.pi * RIPPLE_HZ * (TIME - CREST_S))
    shorts = wire_shorts(run)
    # the wire touches the pool for about 9 ms before each crack, and the sizzle dips
    touching = uniform_filter1d(1. * (shorts > 0), size=400, origin=-199) > 1e-6
    burn = burn * amp(LULL_DB * touching)
    sizzle = noise() * unit(amp(4.0 * ripple + 2.4 * walk(130))) * burn * amp(-1.5)
    flash = sum(amp(db) * (TIME > s) * np.exp(-np.abs(TIME - s) / FLASH_DECAY_S) for s, db in STRIKES)
    # the gas nozzle rings with the sizzle, most while the bead is young
    nozzle_db = np.interp(TIME, [7.0, 7.7], [-1, -14])
    sizzle = sizzle + resonate(sizzle, 10640, 660) * amp(nozzle_db)
    # small droplets burst mostly near the crest of the current
    bursts = rng.random(N) < 650 / SR * amp(9 * ripple - 2)
    sizes = shorts + bursts * burn * amp(7 + 3.2 * np.clip(noise(), -2, 1))
    # each crack leaves a short noisy tail, in a fast and a slow part
    tails = np.sqrt(amp(-18.0) * fade(sizes ** 2, 0.00033) + amp(-49.5) * fade(sizes ** 2, 0.0039))
    cracks = colour(sizes, CRACK_COLOUR) + tails * np.sign(noise())
    arc = colour(sizzle + flash * noise() + cracks, ARC_COLOUR)
    # the yard returns a faint, short wash
    wash = rng.standard_normal(SR // 4) * np.exp(-TIME[:SR // 4] / 0.011)
    arc = arc + amp(-11.0) * signal.oaconvolve(arc, wash / np.linalg.norm(wash))[:N]
    return place(arc, side_db=-12.0, left_db=-0.3)


def scene():
    """The three jobs, one after another, in the open air."""
    return cutting() + wind() + grinding() + yard() + knock() + welding()


def record(dry):
    """A steep low-pass removes the extreme treble."""
    return signal.sosfilt(signal.ellip(8, .2, 70, TOP_HZ, fs=SR, output="sos"), dry)


dry = scene()
out = record(dry)
master(out)
```